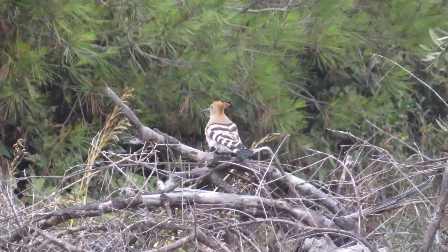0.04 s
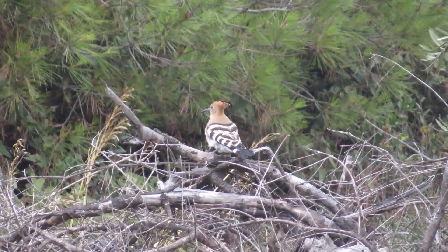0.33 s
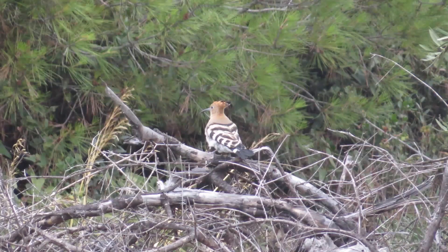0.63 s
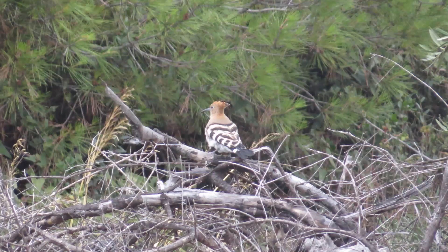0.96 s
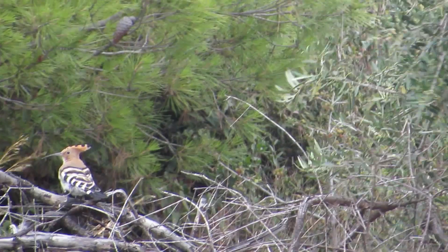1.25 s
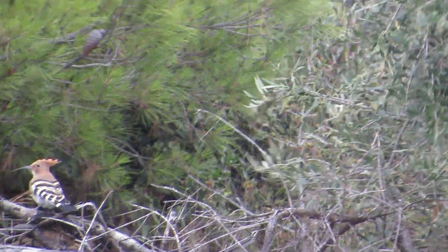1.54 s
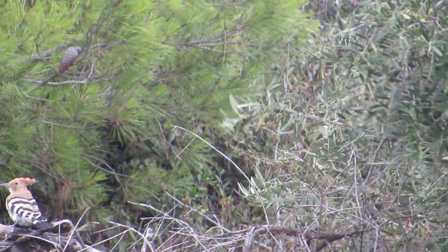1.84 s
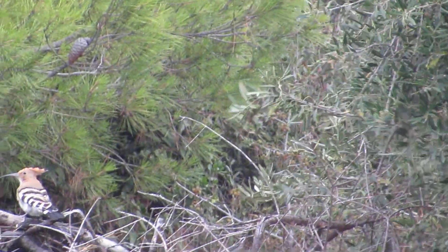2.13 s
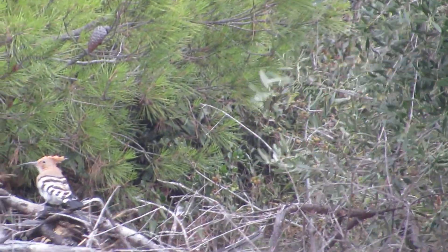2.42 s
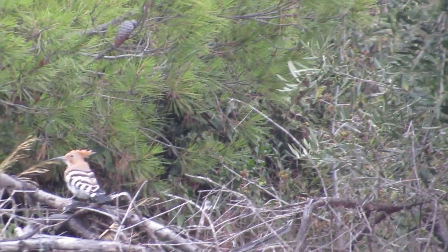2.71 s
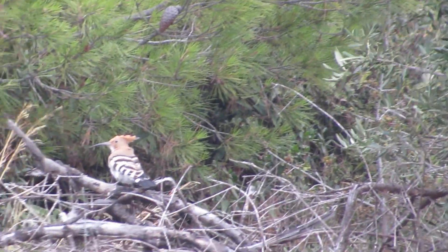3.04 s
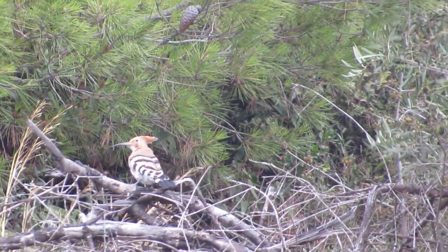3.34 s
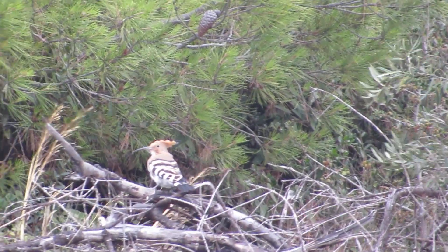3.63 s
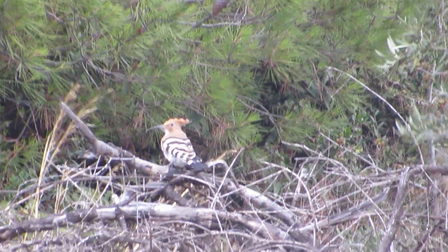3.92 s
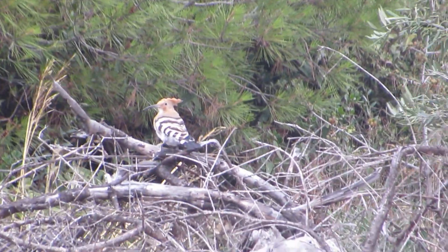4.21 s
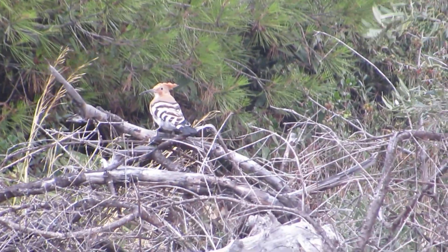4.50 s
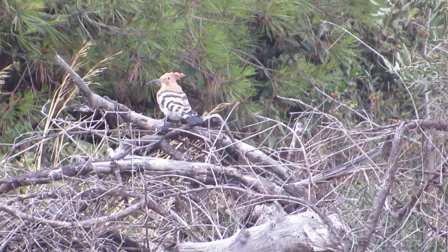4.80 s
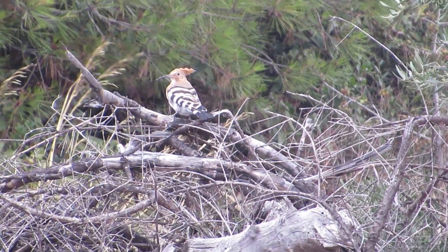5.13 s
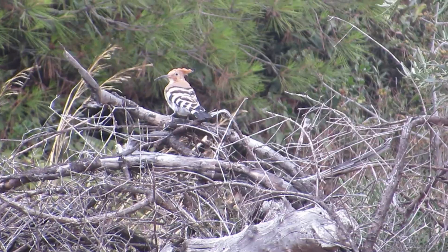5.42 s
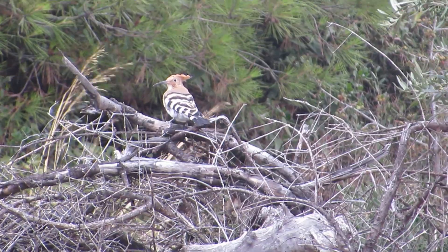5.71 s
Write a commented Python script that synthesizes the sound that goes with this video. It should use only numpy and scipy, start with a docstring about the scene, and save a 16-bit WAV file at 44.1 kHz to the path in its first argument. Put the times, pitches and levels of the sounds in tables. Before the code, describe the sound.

Wind hits a hand-held microphone in irregular gusts, making a loud low rumble with fluttering thumps. Behind it, several cicadas chirp out of step in a pine wood, a high raspy buzz pulsing about five times a second, over a faint distant chorus and a soft hiss of air. The insects sink in level after the strongest gusts, about a second in, but keep going throughout.

```python
"""A pine wood, where three cicadas chirp out of step over a far chorus and the hiss of air in the needles.
Each insect buckles the ribs of its tymbals in about 170 strokes a second, and its abdomen resonates
with the clicks. Turbulent gusts buffet the ports of a hand-held camera; after the strongest of them
the whole wood sinks in level and comes back. Faint ticks and a thin whine lie underneath."""
import sys
import numpy as np
from scipy import signal
from scipy.fft import rfft, irfft
from scipy.io import wavfile
from scipy.ndimage import uniform_filter1d, minimum_filter1d, map_coordinates

SR = 44100
rng = np.random.default_rng(int(sys.argv[2]) if len(sys.argv) > 2 else 0)


def dump_mix(stems):
    """Bounce the given channels to the path in sys.argv[1] as a 16-bit WAV at rate SR."""
    frames = np.atleast_2d(stems).T  # one column per channel
    limited = np.clip(frames, -1, 1)  # hard clip at full scale
    pcm = np.round(limited * 32767).astype(np.int16)
    wavfile.write(sys.argv[1], SR, pcm)


N = 258426
TIME = np.arange(N) / SR
FREQS = np.maximum(np.arange(N // 2 + 1) * SR / N, 1)
ANTIPHASE = np.array([[1], [-1]])

# The faint whine. Each row: time in seconds, frequency in Hz, level in dB.
WHINE_TRACK = [(0, 15200, -118), (2.3, 15230, -106), (3.3, 15200, -104), (3.6, 15170, -93),
               (4.65, 15040, -89), (4.9, 15040, -96), (5.86, 15000, -94)]
# Spectra of the needles' hiss and the far chorus. Each row: frequency in Hz, relative density in dB.
NEEDLE_SPECTRUM = [(60, -14), (400, -6.5), (750, 2.5), (1100, 1), (1600, -3.5), (2200, -9.5), (3300, -15.5),
                   (4500, -22), (8000, -31.5), (16000, -54)]
CHORUS_SPECTRUM = [(3000, -44), (4090, -9.5), (4390, -0.5), (4740, -1.5), (4950, 0.5), (5510, -4.5),
                   (5640, -2), (5940, -14.5), (6370, -15), (6980, -14.5), (7320, -18.5), (7800, -17.5),
                   (8230, -30), (12190, -25), (14470, -42), (16000, -44.5)]
# The swell of the same two sounds. Each row: time in seconds, relative level in dB.
NEEDLE_SWELL = [(0, -52.5), (.45, -50.5), (1.0, -54), (1.85, -57), (2.25, -53), (2.8, -54.5), (3.3, -54.5),
                (3.9, -56), (4.35, -55.5), (4.75, -54.5), (5.05, -59), (5.4, -56.5), (5.6, -56),
                (5.86, -56)]
CHORUS_SWELL = [(0, -66.5), (.9, -64.5), (1.8, -63), (2.5, -67), (4.0, -70), (5.86, -69)]
# Where the hiss sits. Each row: frequency in Hz, left minus right in dB, left-right correlation.
NEEDLE_IMAGE = [(293, 2.5, 0.17), (840, 3, 0.76), (1280, 6.5, 0.76), (2024, 5.5, 0.45), (2260, -1, 0.5),
                (3160, 4, 0.58), (4100, -2, 0.26), (12000, 9, .2)]
# Faint ticks. Each row: time in seconds, relative level in dB, left minus right in dB.
TICK_EVENTS = [(.965, -22, 5), (1.063, -23, -3.5), (1.102, -51, 17), (1.17, -46, 16), (1.191, -43, -16),
               (1.372, -49, 11), (1.447, -40, 1), (1.629, -41, -21), (1.75, -50, 18), (2.048, -37, 4),
               (4.632, -36, 0), (4.98, -34, -10), (5.156, -40, 0)]
# The breeze between gusts. Each row: time in seconds, relative level in dB.
BREEZE_LEVEL = [(.05, -30), (.22, -36.5), (.33, -22), (.4, -20.5), (1.35, -20.5), (2.2, -21), (2.6, -25),
                (3.2, -19), (3.7, -19), (3.99, -28), (4.08, -23), (4.3, -20.5), (4.4, -27), (4.55, -20),
                (4.68, -22), (5.2, -23.5), (5.86, -31.5)]
# Gusts. Each row: start in seconds, length in seconds, relative level in dB, nominal roll-off in Hz.
PORT_GUSTS = [(0.071, 0.019, -24, 240), (0.37, 0.19, -17, 154), (0.64, 0.16, -12.5, 86),
              (0.859, 0.099, -8, 118), (0.964, 0.15, -12.5, 390), (1.14, 0.052, -15.5, 237),
              (1.222, 0.041, -15, 427), (1.287, 0.13, -19, 213), (1.421, 0.067, -11.5, 381),
              (1.513, .195, -14.5, 311), (1.752, 0.042, -17, 406), (1.845, 0.1, -21, 236.5),
              (2.046, 0.016, -17, 190), (2.424, 0.024, -12, 237), (2.471, 0.044, -15.5, 214),
              (2.848, 0.12, -19, 180), (3.074, 0.017, -12, 216), (3.114, 0.033, -15, 229),
              (3.201, .075, -14, 244), (3.282, 0.028, -15.5, 190), (3.459, 0.2, -12, 156),
              (3.702, 0.041, -12, 198), (3.83, 0.02, -14, 277), (4.602, 0.013, -15, 249),
              (4.738, 0.11, -11.5, 154.6), (4.907, 0.029, -7, 204), (4.969, 0.081, -13.5, 251),
              (5.093, 0.078, -18.5, 205), (5.421, 0.12, -12.5, 143.7), (5.585, 0.093, -22, 117)]
# The wind's bass, thinner in the long gusts. Each row: time in seconds, low cut in Hz.
WIND_LOW_CUT = [(0, 175), (.9, 148), (1.02, 251), (1.8, 252), (2.0, 67.6), (2.6, 59), (4.7, 95),
                (5.5, 259.7)]
# The wind common to both channels. Each row: frequency in Hz, relative level in dB.
WIND_IN_PHASE = [(60, -14.5), (200, -15.5), (500, -12), (1000, -5.5), (2000, -1)]
# The hardest eddies. Each row: time in seconds, relative peak in dB, centre frequency in Hz.
HARD_EDDIES = [(0.039, -3, 228), (.083, -14, 245), (0.375, -6.5, 162), (0.39, -6.5, 175), (.454, -5.5, 156),
               (0.552, -5, 166), (0.91, -2, 197), (.971, -2.5, 473), (0.992, -7, 300), (1.023, -8, 310),
               (1.061, -9, 302), (1.078, -5, 583), (1.181, -12, 380), (1.232, -7.5, 426), (1.257, -11, 444),
               (1.364, -16, 178.5), (1.429, 0.5, 370), (1.46, -5, 360), (1.526, -7, 340), (1.58, -3.5, 230),
               (1.682, -2.5, 261), (1.753, -10, 530), (1.778, -13, 321), (1.795, -6, 390),
               (1.834, -16.5, 290), (1.856, -14, 276), (1.898, -16, 295), (1.926, -16, 181),
               (1.995, -11, 111.4), (2.083, -16, 290), (2.15, -16, 167), (2.192, -11, 157.3),
               (2.222, -17, 193), (2.294, -16, 110.4), (2.342, -14, 173), (2.438, -3.5, 184),
               (2.486, -9.5, 290), (2.667, -9, 160.8), (2.683, -16, 175.7), (2.779, -12.5, 143),
               (2.847, -19, 193), (2.873, -14.5, 180), (2.955, -10.5, 161.3), (3.082, 1, 204),
               (3.149, -5.5, 163), (3.228, -4.5, 275), (3.274, -7.5, 259), (3.397, -8.5, 126.4),
               (3.487, -17, 165), (3.513, -15, 202.6), (3.558, -9.5, 215.7), (3.637, -11, 170),
               (3.724, -2.5, 166.6), (3.846, -3.5, 217.6), (3.905, -12.5, 319), (4.07, -17, 215),
               (4.619, -6.5, 155.5), (4.751, -4, 180), (4.806, 0, 159), (4.928, -1, 234),
               (4.984, -1.5, 234), (5.009, -4.5, 290), (5.043, -8.5, 238.4), (5.175, -13, 291),
               (5.256, -23, 170), (5.454, -2, 177.7), (5.484, -7, 175), (5.502, -6, 234), (5.611, -17, 179)]
# Dips in the wood's level. Each row: start in seconds, depth in dB, recovery time constant in seconds.
WOOD_DIPS = [(0, 14, 0.63), (.93, 16, 2.5), (1.42, 18.5, 1.6), (3.098, 8, 2.55), (4.802, 6.5, 3.2),
             (4.93, 9, 0.85), (5.471, 9, 0.43)]
# Resonances of each insect's body. Each row: frequency in Hz, relative gain in dB.
STEADY_RESONANCES = [(3000, -44), (4090, -20.5), (4690, -1), (4780, 0.5), (4910, -2), (5080, -4),
                     (5250, -3.5), (5470, -12.5), (5640, -9.5), (5860, -11), (6030, -18.5), (6330, -16.5),
                     (6720, -7), (7060, -10), (7360, -17.5), (7620, -10.5), (7920, -16.5), (8050, -18),
                     (8270, -31.5), (8440, -19), (8700, -24), (9040, -14.5), (9300, -22), (9600, -26.5),
                     (12400, -32), (12830, -44), (14470, -49), (16000, -50)]
MELLOW_RESONANCES = [(3000, -36.5), (4090, -14.5), (4350, -10.5), (4520, -4), (4690, -1), (5000, -8),
                     (5250, -9.0), (5510, -2), (5680, -13.5), (5940, -10.5), (6330, -19), (7190, -22),
                     (7800, -13), (8270, -23.5), (8530, -22.5), (11460, -45), (12400, -29), (12530, -38.5),
                     (14470, -38.5), (16000, -49)]
SHRILL_RESONANCES = [(3000, -50.5), (4090, -23.5), (4480, -5.5), (4690, -1.5), (4780, 0.0), (4950, -6),
                     (5120, 0.5), (5340, -2), (5470, -7.5), (5640, -5), (6370, -18.5), (6930, -12.5),
                     (7110, -6.5), (7240, -18), (7580, -8), (8530, -24.5), (9560, -22), (12320, -23),
                     (14470, -47), (16000, -51)]
# The chirps of each insect. Each row: start in seconds, length in seconds, relative level in dB.
STEADY_SONG = [(-0.002, 0.119, 4.5), (0.209, 0.14, 5.5), (0.416, 0.13, 7), (0.619, 0.1, 4),
               (0.812, 0.11, 1.5), (1.002, 0.12, 1), (1.225, 0.12, 1.5), (1.46, 0.105, -1),
               (1.65, 0.11, -3.5), (1.855, 0.122, 3.5), (2.072, 0.11, 4.5), (2.27, 0.12, 4.5),
               (2.472, 0.122, 3), (2.69, 0.125, 1.5), (2.892, 0.14, 1), (3.104, 0.114, -0.5),
               (3.304, 0.131, 0.0), (3.52, 0.12, 2), (3.725, 0.12, -0.5), (3.936, 0.113, -2.5),
               (4.153, 0.13, -2.0), (4.359, 0.12, -1), (4.576, 0.11, -1), (4.767, 0.15, -5.5),
               (4.997, 0.11, -6), (5.214, 0.113, -3), (5.402, 0.11, 1), (5.614, 0.13, -1),
               (5.832, 0.13, -3.0)]
MELLOW_SONG = [(0.032, 0.118, 4), (0.236, 0.145, -1), (0.417, 0.147, 7.5), (0.644, 0.117, 6),
               (0.87, 0.107, -0.5), (1.032, 0.086, -5), (1.3, 0.099, 0), (1.518, 0.088, 1.0),
               (1.732, 0.118, -0.5), (1.958, 0.107, -1), (2.167, 0.092, 1.5), (2.363, 0.098, 5),
               (2.556, 0.128, 3), (2.795, 0.102, 4), (3.012, 0.089, 4.5), (3.202, 0.095, 2),
               (3.401, 0.103, 2.0), (3.624, 0.106, 0.5), (3.832, 0.111, -0.5), (4.071, 0.097, 2),
               (4.269, 0.091, 2.5), (4.477, 0.11, 5), (4.687, 0.118, 2.5), (4.891, 0.128, -2.5),
               (5.129, 0.102, -1), (5.327, 0.122, -0.5), (5.531, 0.129, 0.0), (5.733, 0.114, -1.5)]
SHRILL_SONG = [(0.004, 0.11, 1), (0.28, 0.074, 1), (0.468, 0.097, 3), (0.64, 0.15, 5), (0.853, 0.084, -1.5),
               (1.097, 0.092, -7), (1.342, 0.126, 2), (1.592, 0.14, -8.5), (1.848, 0.077, -3),
               (2.088, 0.081, 0), (2.232, 0.14, 2), (2.454, 0.155, -1), (2.664, 0.12, 1.5),
               (2.91, 0.132, -1.5), (3.137, 0.14, 2), (3.337, 0.16, -0.5), (3.587, 0.14, -1.5),
               (3.807, 0.168, -2.5), (4.04, 0.15, -0.5), (4.263, 0.159, -1.5), (4.508, 0.16, -2.5),
               (4.732, 0.18, -4.5), (4.981, 0.159, -1), (5.202, 0.143, 0), (5.404, 0.17, 0),
               (5.64, 0.13, -5)]
# The camera's narrow notches. Each entry: centre frequency in Hz.
CAMERA_NOTCHES = [3930, 7870]


def from_db(db):
    """Amplitude ratio of a level in decibels."""
    return 10 ** (np.asarray(db) / 20)


def unit_rms(x):
    """Normalisation to unit mean power."""
    return x / np.sqrt(np.mean(x ** 2) + 1e-20)


def in_time(rows):
    """Linear interpolation of each column at every sample."""
    seconds, *columns = np.transpose(rows)
    return [np.interp(TIME, seconds, column) for column in columns]


def at_hz(rows, hz, column=1):
    """Interpolation of one column on a logarithmic frequency axis."""
    rows = np.array(rows)
    return np.interp(np.log(hz), np.log(rows[:, 0]), rows[:, column])


def noise_pair(spectrum):
    """Spectral shaping of two independent white noises, at unit power."""
    return unit_rms(irfft(rfft(rng.standard_normal((2, N))) * from_db(at_hz(spectrum, FREQS)), N))


def drift(rate_hz):
    """Low-passed noise: a slow random fluctuation of unit power."""
    return unit_rms(irfft(rfft(rng.standard_normal(N)) / (1 + (FREQS / rate_hz) ** 2), N))


def ripple(rate_hz, trend_samples):
    """Band-limited fluctuation: a drift less its moving average."""
    wander = drift(rate_hz)
    return unit_rms(wander - uniform_filter1d(wander, size=trend_samples))


def smooth(x, seconds):
    """Exponential relaxation with the given time constant."""
    pole = np.exp(-1 / (seconds * SR))
    return signal.lfilter([1 - pole], [1, -pole], x + 1e-18)


def panned(pan_db):
    """A level difference shared evenly between the left and right gains."""
    return from_db(np.array([pan_db, -pan_db]).reshape(2, -1) / 2)


def whine():
    """Random amplitude and frequency modulation make one faint, high tone waver."""
    hz, db = in_time(WHINE_TRACK)
    amplitude = from_db(db + 3 * drift(12))
    return amplitude * np.sin(2 * np.pi * np.cumsum(hz + 35 * drift(60)) / SR)


def needle_hiss(waver_db):
    """Air in the needles makes broadband noise; partial correlation of the channels gives it width."""
    level_db, = in_time(NEEDLE_SWELL)
    mid, side = rfft(noise_pair(NEEDLE_SPECTRUM))
    correlation = at_hz(NEEDLE_IMAGE, FREQS, column=2)
    pair = np.sqrt(1 + correlation) * mid + np.sqrt(1 - correlation) * side * ANTIPHASE
    hiss = irfft(pair * panned(at_hz(NEEDLE_IMAGE, FREQS)), N)
    return from_db(level_db + waver_db * drift(35)) * hiss


def far_chorus(waver_db, pan_db):
    """Many distant cicadas add incoherently, so their sum is a steady sizzle of noise."""
    level_db, = in_time(CHORUS_SWELL)
    mid, side = noise_pair(CHORUS_SPECTRUM)
    return from_db(level_db + waver_db * drift(7)) * (mid + .49 * side * ANTIPHASE) * panned(pan_db)


def ticks(decay_s):
    """Low-passed impulses in antiphase: tiny dry ticks, mostly in the gusts and often to one side."""
    impulses = np.zeros((2, N))
    for when, db, pan_db in TICK_EVENTS:
        impulses[:, round(when * SR)] = from_db(db) * panned(pan_db)[:, 0]
    return smooth(-ANTIPHASE * impulses, decay_s)


def airflow(puff_db, breeze_rolloff_hz, attack_s, release_s):
    """Gusts and a puffing breeze add in power. Gives their level in dB and power-weighted roll-off."""
    breeze_db, = in_time(BREEZE_LEVEL)
    power = from_db(breeze_db + puff_db * ripple(26, trend_samples=5000)) ** 2
    weighted_hz = power * breeze_rolloff_hz
    for start, length, db, hz in PORT_GUSTS:
        fade = np.maximum(start - TIME, 0) / attack_s + np.maximum(TIME - start - length, 0) / release_s
        gust_power = from_db(db - np.minimum(fade, 20) * 20 / np.log(10)) ** 2
        power += gust_power
        weighted_hz += gust_power * hz
    return 10 * np.log10(power), weighted_hz / power


def port_wind(flow_db, nominal_hz, gain_db, flutter_db, reach, steepness):
    """Turbulence at the ports falls off about exponentially with frequency and is mostly in antiphase."""
    low_cut_hz, = in_time(WIND_LOW_CUT)
    flutter = ripple(55, trend_samples=2000)
    # faster air reaches higher, so the flutter brightens as it swells
    rolloff_hz = reach * np.maximum(nominal_hz, 55) * from_db(.59 * flutter)
    white = rfft(rng.standard_normal((2, N)))
    side, mid, power = 0, 0, 0
    for hz in 20 * 2 ** np.arange(0, 7.6, .5):  # overlapping bands half an octave apart
        band = np.cos(np.pi / 2 * np.clip(2 * np.log2(FREQS / hz), -1, 1)) ** 2
        opposed, common = irfft(white * band, N)
        gain = np.exp(-(hz / rolloff_hz) ** steepness) * hz / np.hypot(hz, low_cut_hz)
        side += gain * opposed
        mid += gain * common * from_db(at_hz(WIND_IN_PHASE, hz))
        power += gain ** 2 * band.mean()
    # small, fast eddies leave more in common
    mid *= np.hypot(.9, rolloff_hz / 500)
    pair = (mid + side * panned(.31) * ANTIPHASE) / np.sqrt(power)
    # dividing out the chance envelope lets the flow set the loudness
    local_power = uniform_filter1d(np.mean(pair ** 2, axis=0), size=1100)
    envelope = np.sqrt(uniform_filter1d(local_power, size=1100))
    return from_db(gain_db + flow_db + flutter_db * flutter) * pair / envelope


def buffets(flow_db, small_per_s, small_hz, roundness, common_db):
    """A passing eddy is a brief swing of pressure: a dry thump at low roundness, a wobble at high."""
    # small eddies join the hard ones as a Poisson process and scale with the flow
    gaps, sizes, pitches = rng.random((120, 3)).T
    times = np.cumsum(-np.log(gaps)) / small_per_s
    small = [(when, flow_db[int(when * SR)] + 1.5 * size, small_hz * 2 ** (pitch - .5))
             for when, size, pitch in zip(times, sizes, pitches) if when < TIME[-1]]
    pressure = np.zeros(N)
    for (when, db, hz), turn in zip(list(HARD_EDDIES) + small, rng.random(200)):
        near = np.abs(TIME - when) < .06
        scaled_time = 2 * np.pi * hz * (TIME[near] - when) / roundness
        pulse = np.exp(2j * np.pi * turn) / (1 - 1j * scaled_time) ** roundness
        pressure[near] += from_db(db) * pulse.real
    return pressure * (ANTIPHASE + from_db(common_db))


def wood_gain(full_db, attack_s):
    """The wood's level sinks quickly at each dip and relaxes exponentially; the deepest dip prevails."""
    depth_db = np.zeros(N)
    for start, db, recovery_s in WOOD_DIPS:
        onset = np.clip((TIME - start) / attack_s, 0, 1)
        decay = np.exp(-np.maximum(TIME - start - attack_s, 0) / recovery_s)
        depth_db = np.maximum(depth_db, db * onset * decay)
    return from_db(full_db - depth_db)


def chirp_effort(song, first_force, rise_s, fall_s, glide):
    """Effort modulates each chirp: stroke force, stroke pace and the tuning of the tightening abdomen."""
    force, pace, detune = np.zeros(N), np.ones(N), np.zeros(N)
    for start, length, db in song:
        inside = slice(*np.searchsorted(TIME, [start, start + length]))
        age = TIME[inside] - start
        swell = np.clip(first_force + age / rise_s, 0, 1)
        release = np.clip((length - age) / fall_s, 0, 1)
        force[inside] = from_db(db) * swell * release
        # the strokes start slow, catch up, then slacken towards the end
        pace[inside] = 1 - .22 * np.exp(-age / .018) - .07 * (age / length) ** 2
        detune[inside] = glide * (age / length - .5)
    return force, pace, detune


def tymbal(stroke_hz, rib_gap_s, rasp_db):
    """Buckling: each stroke snaps three ribs in turn, and each click ends in a brief rasp."""
    cycles = np.cumsum(stroke_hz * (1 + .008 * drift(4))) / SR
    starts = np.flatnonzero(np.diff(np.floor(cycles))) / SR
    jitter = rng.standard_normal((7, len(starts)))
    gap_jitter, level_jitter, start_jitter = jitter[:3], jitter[3:6], jitter[6]
    clicks = np.zeros(N)
    for rib in range(3):
        when = starts + .00006 * start_jitter + rib * rib_gap_s * (1 + .036 * gap_jitter[rib])
        clicks[np.clip(when * SR, 0, N - 1).astype(int)] += from_db(-1.5 * rib + 2 * level_jitter[rib])
    rasp = np.sqrt(smooth(clicks ** 2, .0048)) * rng.standard_normal(N)
    return unit_rms(clicks + from_db(rasp_db) * rasp)


def abdomen_response(resonances):
    """A minimum-phase resonator is causal: it rings after each click, never before."""
    cepstrum = irfft(np.log(unit_rms(from_db(at_hz(resonances, FREQS)))), N)
    return np.exp(rfft(cepstrum * (1 + np.sign(np.fft.fftfreq(N)))))


def path_response(pan_db, right_lag_us, scatter_db=-13, t60_s=.07):
    """Superposition of the direct sound, offset between channels, and echoes scattered by the trees."""
    delays_s = np.array([[0], [right_lag_us]]) / 1e6
    direct = np.exp(-2j * np.pi * FREQS * delays_s) * panned(pan_db)
    decay = from_db(-60 * np.minimum(TIME / t60_s, 2))
    echoes = unit_rms(rng.standard_normal((2, N)) * decay) / np.sqrt(N)
    return direct + from_db(scatter_db) * rfft(echoes)


def cicada(effort, resonances, gain_db, stroke_hz, rib_gap_s, rasp_db, pan_db, right_lag_us):
    """Source and filter: tymbal clicks excite the abdomen, whose ringing carries through the trees."""
    force, pace, detune = effort
    drive = rfft(force * tymbal(stroke_hz * pace, rib_gap_s, rasp_db))
    buzz = irfft(drive * abdomen_response(resonances) * path_response(pan_db, right_lag_us), N)
    # a tighter body rings faster
    clock = np.arange(N) + np.cumsum(detune)
    return from_db(gain_db) * np.array([map_coordinates(channel, [clock], order=3) for channel in buzz])


def scene():
    """Superposition of the wood, whose level dips, with the wind on the ports, the ticks and the whine."""
    steady = chirp_effort(STEADY_SONG, first_force=.54, rise_s=.045, fall_s=.014, glide=.018)
    mellow = chirp_effort(MELLOW_SONG, first_force=.43, rise_s=.044, fall_s=.012, glide=.01)
    shrill = chirp_effort(SHRILL_SONG, first_force=.63, rise_s=.045, fall_s=.0089, glide=.012)
    wood = cicada(steady, STEADY_RESONANCES, gain_db=-58, stroke_hz=181, rib_gap_s=.00085,
                  rasp_db=-1.5, pan_db=-2, right_lag_us=52.4)
    wood += cicada(mellow, MELLOW_RESONANCES, gain_db=-62.5, stroke_hz=153, rib_gap_s=.000645,
                   rasp_db=2, pan_db=-5, right_lag_us=26)
    wood += cicada(shrill, SHRILL_RESONANCES, gain_db=-61.6, stroke_hz=170, rib_gap_s=.00072,
                   rasp_db=4, pan_db=.5, right_lag_us=-22.5)
    wood += far_chorus(waver_db=.9, pan_db=-5.5) + needle_hiss(waver_db=.63)
    wood *= wood_gain(full_db=7.5, attack_s=.074)
    flow_db, nominal_hz = airflow(puff_db=2.5, breeze_rolloff_hz=96.3, attack_s=.01, release_s=.017)
    wind = port_wind(flow_db, nominal_hz, gain_db=-1.84, flutter_db=1.5, reach=.74, steepness=1.089)
    eddies = buffets(flow_db, small_per_s=5, small_hz=170, roundness=2.7, common_db=-13)
    return wood + wind + eddies + ticks(decay_s=.00004) + whine()


def limiter(x, ceiling):
    """Look-ahead limiting: the gain eases down before a peak would pass the ceiling, then recovers."""
    allowed = np.minimum(1, ceiling / (np.abs(x).max(axis=0) + 1e-9))
    gain = minimum_filter1d(allowed, size=401)
    return x * uniform_filter1d(uniform_filter1d(gain, size=201), size=201)


def record(dry, silence_s=.036, low_cut_hz=42, high_cut_hz=15800):
    """Band limiting: the camera thins the rumble, cuts two notches, limits and drops the top."""
    high_pass = signal.butter(1, low_cut_hz, "high", fs=SR, output="sos")
    low_pass = signal.ellip(10, .2, 90, high_cut_hz, fs=SR, output="sos")
    out = signal.sosfilt(high_pass, dry * (TIME >= silence_s))  # the sound begins after a brief silence
    for hz in CAMERA_NOTCHES:
        out = signal.lfilter(*signal.iirnotch(hz, hz / 270, fs=SR), out)  # 270 Hz wide
    return signal.sosfilt(low_pass, limiter(out, ceiling=.98))


dry = scene()
out = record(dry)
dump_mix(out)
```